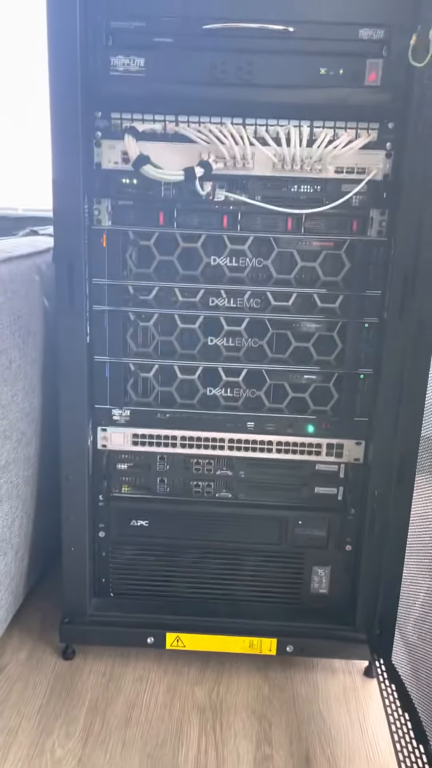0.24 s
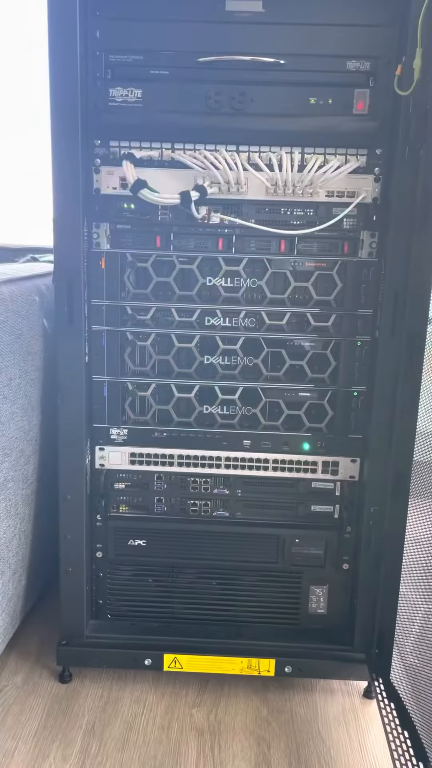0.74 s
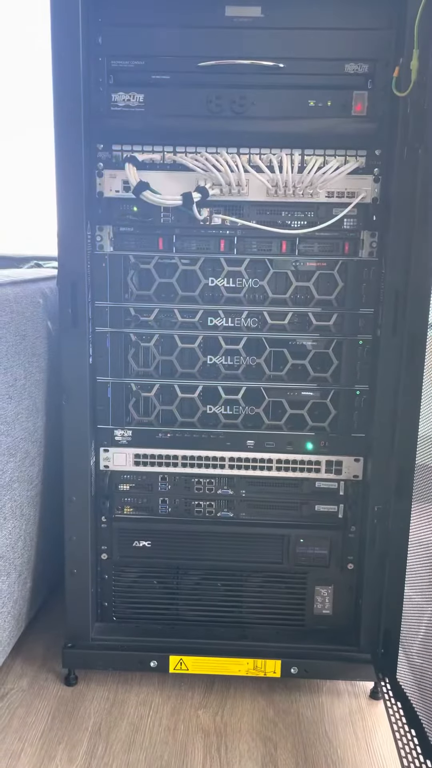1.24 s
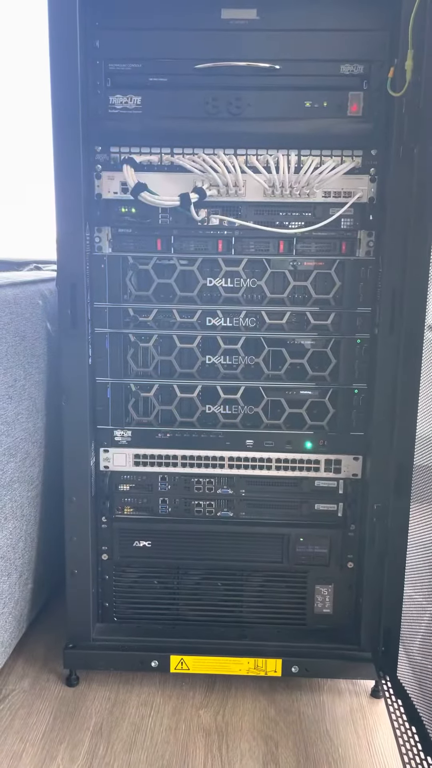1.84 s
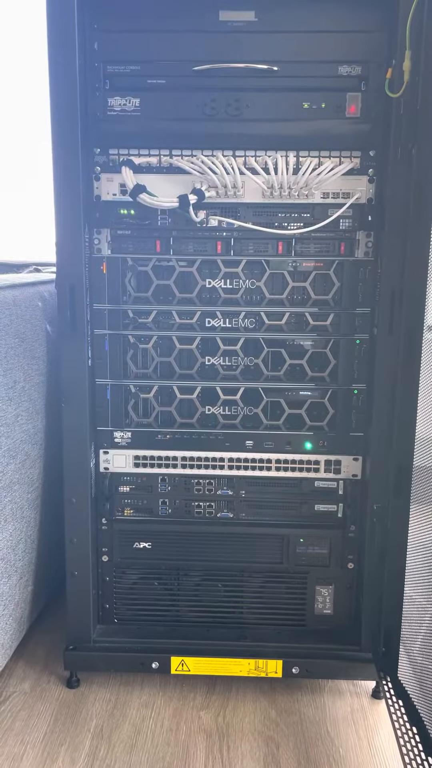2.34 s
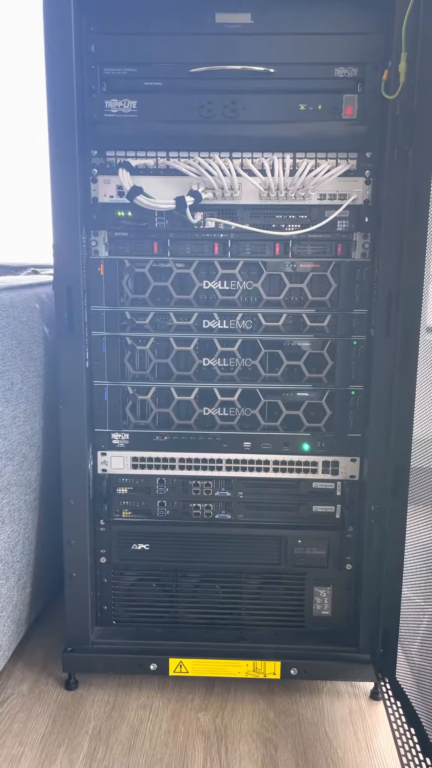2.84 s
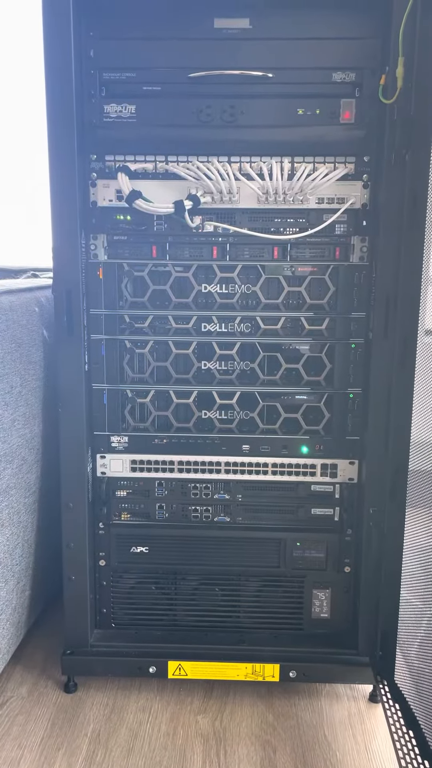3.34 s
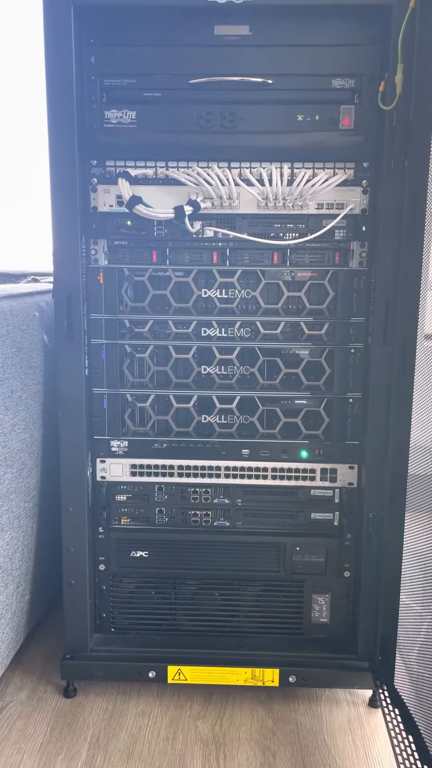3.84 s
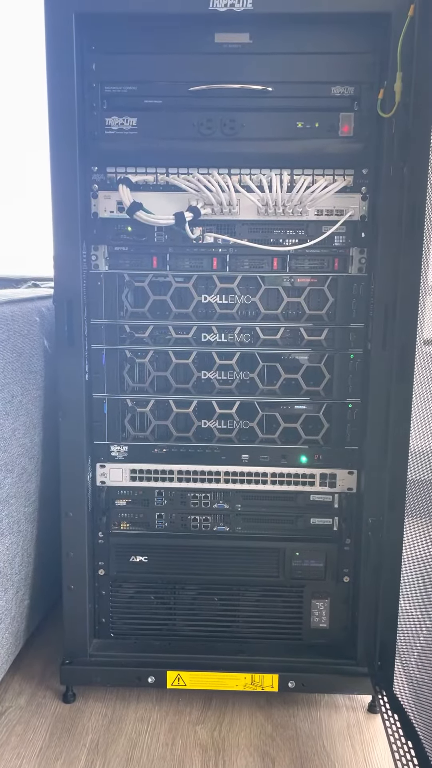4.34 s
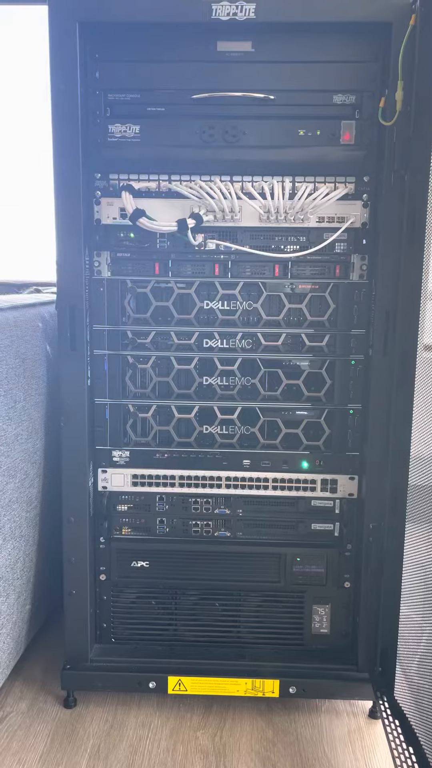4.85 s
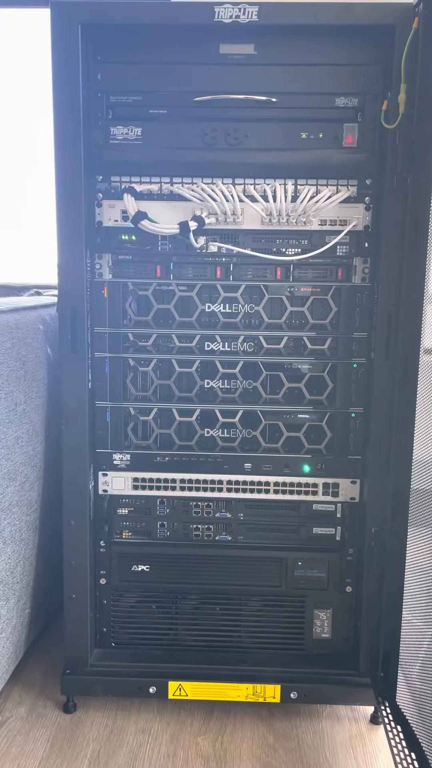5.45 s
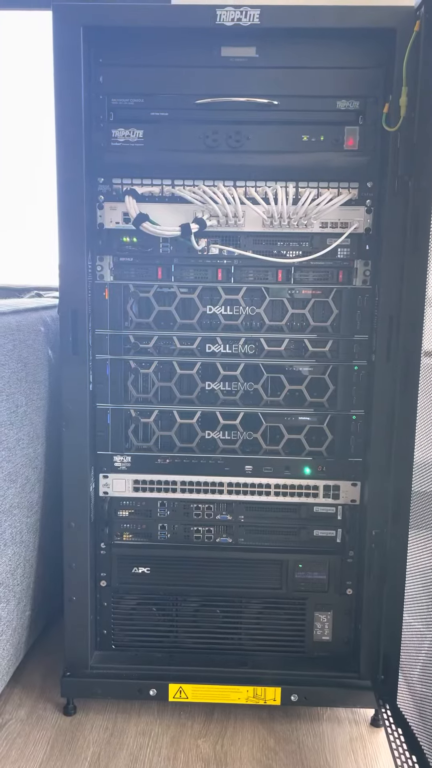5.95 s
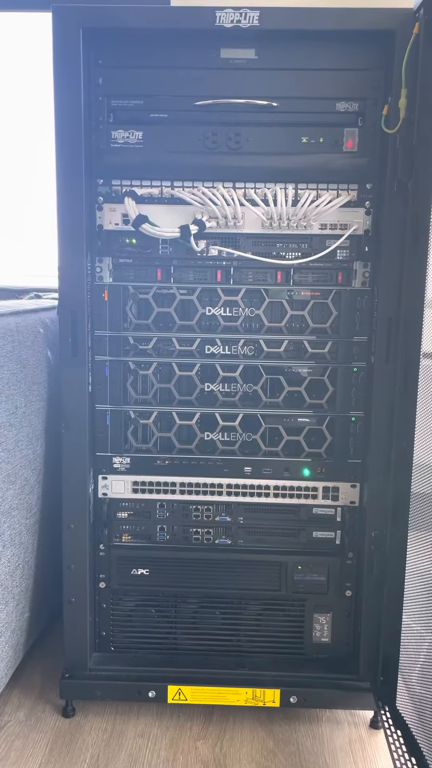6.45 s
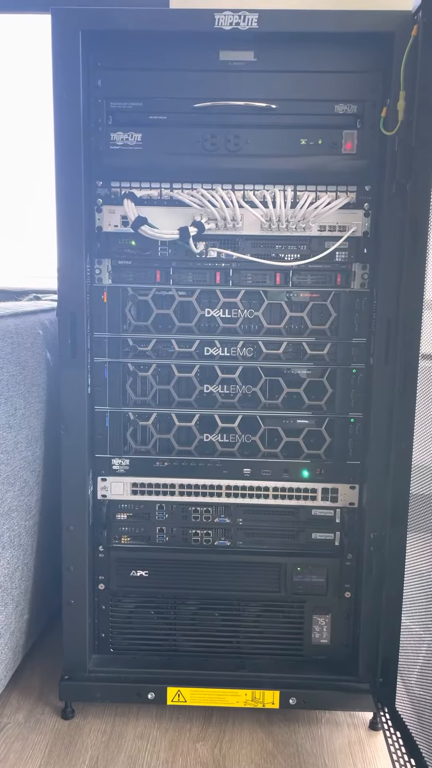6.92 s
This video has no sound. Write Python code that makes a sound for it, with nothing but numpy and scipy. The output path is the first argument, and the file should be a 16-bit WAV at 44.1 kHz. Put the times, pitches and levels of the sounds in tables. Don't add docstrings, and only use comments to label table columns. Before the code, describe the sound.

Small cooling fans in a server rack speed up from a mid-pitched hum to a fairly loud whine within about a second and a half, with air rush swelling alongside. The pitch peaks, then sinks very slightly and holds. Closely tuned fans beat, making the tone pulse and flutter. Other machines hum steadily underneath. Close stereo pickup in a small room.

```python
import sys
import numpy as np
from scipy import signal
from scipy.io import wavfile
from scipy.ndimage import uniform_filter1d

SR = 44100
rng = np.random.default_rng(int(sys.argv[2]) if len(sys.argv) > 2 else 0)


def unload_wav(signal):
    wavfile.write(
        sys.argv[1],
        SR,
        np.round(np.clip(np.atleast_2d(signal).T, -1, 1) * 32767).astype(np.int16),
    )


def volts(x):
    e = np.asarray(x, float) / 20
    return 10 ** e


N = 316638

# (frequency [Hz], density [dB per Hz])
RACK_SPECTRUM = [(12, -98), (30, -106), (52, -70), (90, -89.5), (200, -71), (400, -75), (700, -73.5),
                 (1400, -80.5), (2200, -77), (2800, -96.5), (3900, -82.5), (5600, -91), (6000, -93.5),
                 (15500, -120)]
# (frequency [Hz], width [Hz], density [dB per Hz])
CASE_HUMS = [(62, 16, -69), (121.9, 8.3, -66.5), (673, 19, -65.5), (1713, 61, -72.5), (2360, 54, -81),
             (3690, 43, -81)]
# (time [s], length [s], rise [dB])
BOOM_SURGES = [(.2, 0.56, 6.5), (1.0, 0.37, 3.5), (1.4, 0.4, 8.5), (2.2, .4, 2), (2.9, 0.38, 4),
               (3.57, 0.24, 7), (4.58, 0.27, 3.5), (4.95, 0.14, 5), (5.33, 0.1, 7.5), (5.7, .15, 6),
               (5.98, 0.17, 7), (6.52, 0.62, 6), (6.9, .5, 4)]
# (frequency [Hz], level [dB], swing [dB])
RACK_TONES = [
    (285, -58, 2.),
    (970, -62, 2.),
    (1713, -63, 2.),
]
# (time [s], length [s], rise [dB])
SLOW_FAN_SWELLS = [(.5, .2, 8), (1.04, .2, 17.5), (1.5, 0.47, 10), (2.2, 0.81, 10.5), (2.9, 0.33, 15.5),
                   (3.65, .2, 6), (4.2, 0.76, 8), (4.62, 0.13, 17), (4.95, .35, 12), (5.62, 0.34, 17.5),
                   (6.07, 0.26, 13), (6.85, 0.98, 16.5)]
# (frequency [Hz], density [dB per Hz])
AIR_RUSH = [(600, -77), (900, -74), (1280, -71), (1480, -83.5), (1750, -71), (2000, -84), (2400, -72.5),
            (2700, -81), (4200, -88.5), (5800, -90.5), (6500, -86), (9000, -100.5), (13300, -111),
            (15500, -113)]
# (multiple of blade rate [1], width [Hz], density [dB per Hz])
CHOPPED_AIR = [(1, 130, -64.5), (2, 53, -68.5), (3, 64, -70.5), (4, 180, -77), (5, 100, -79),
               (5.93, 95, -79), (7.1, 260, -79.5), (7.8, 83, -85.5), (9.1, 190, -86)]
# (frequency [Hz], width [Hz], density [dB per Hz])
DUCT = (4300, 120, -81.5)
# (multiple [1], level at full speed [dB], gain per 1% of speed [dB])
OVERTONES = [(2, -50, -0.4), (3, -51, 1.1), (4, -57, 0.55), (5, -72, .6), (6, -61, .6), (7, -76, 8),
             (8, -69.5, .3)]
# (time [s], multiple [1], length [s], change [dB])
OVERTONE_SWELLS = [(.5, 2, .4, 1.5), (.8, 2, .2, -13), (1.094, 2, 0.35, 6.5), (1.806, 2, 1.1, 5.5),
                   (2.45, 2, 0.33, 8), (3.08, 2, 0.29, 12.5), (3.53, 2, 0.21, 11), (3.986, 2, 0.31, 7.5),
                   (4.997, 2, 0.21, 6), (6.896, 2, .3, 3.5), (1.1, 3, 0.75, 4.5), (2.25, 3, 0.25, 2),
                   (2.92, 3, 0.16, 7), (3.5, 3, 0.91, 9.5), (4.7, 3, 0.76, 6), (6.2, 3, 1.6, -17),
                   (.8, 4, 1.1, 11.5), (2.0, 4, 0.37, 4), (3.1, 4, 0.9, 6.5), (5.106, 4, 0.3, 10),
                   (6.3, 4, .25, 8), (1.2, 6, .5, 9.5), (2.9, 6, 0.76, 6.5), (5.6, 6, 1.2, 9), (6.8, 6, 0.76, 7),
                   (3.0, 8, 2.1, 10), (4.6, 8, 1.4, 11.5)]
# (time [s], level [dB], dip that follows [dB])
SWELLS = [(0.24, -39, -28), (0.42, -40.5, -18), (0.633, -33.5, -10), (0.781, -34, -28), (0.885, -35.5, -23),
          (0.962, -34.5, -18), (1.09, -37, -25), (1.276, -30, -22), (1.471, -34, -18), (1.619, -38.5, -7.5),
          (1.986, -36.5, -7), (2.148, -34, -3.5), (2.348, -30, -9), (2.481, -29, -9.5), (2.695, -31, -1),
          (2.948, -41, -29), (3.148, -36.5, -14), (3.429, -35.5, -6), (3.8, -37, -11), (4.1, -38, -7),
          (4.53, -37.5, -8), (4.771, -37, -11), (4.976, -35.5, -8), (5.114, -35.5, -5), (5.29, -35.5, -27),
          (5.462, -36.5, -24), (5.705, -38, -1.5), (6.114, -39.5, -6.5), (6.55, -38.5, -5),
          (6.93, -38.5, -30)]
# (time [s], left over right [dB])
LEAN = [
    (0, -4),
    (3.8, -7),
    (4.3, -2),
    (5.3, 1),
    (7.18, 6),
]
# (frequency [Hz], likeness [0-1], right leads [rad], left over right [dB])
PORTS = [(0, 1, 0, 0), (150, .997, .02, .3), (300, .95, .2, 1), (500, .75, .85, -3.5), (700, .85, .75, -3),
         (950, .45, 2.1, -1.5), (1200, .8, .5, -6), (1480, .5, .7, -3), (1620, .9, -.6, -.5),
         (1900, .92, 0, -1.5), (2400, .9, -.7, -2.5), (3500, .3, -2.2, -3), (3900, .7, -3.0 - 1, -2.5),
         (4750, .72, -5.8, .8), (5300, .87, -6.6, 1), (6100, .75, -7.85, .3), (6900, .97, -9.3, 0),
         (8550, .965, -9.75, 0), (9300, .85, -11.2, 0), (10200, .96, -12.3, 0), (11800, .96, -12.9, 0),
         (12700, .85, -14.1, 0), (13400, .96, -15.4, 0), (14900, .96, -16, 0), (16000, .85, -17.6, 0)]

FULL_HZ = 580
SLOW_FAN_HZ, SLOW_FAN_DB = 189, -65
BOOM_HZ, BOOM_WIDTH_HZ, BOOM_DB = 258, 20, -62


def evened(x):
    return x / np.sqrt(np.mean(x ** 2) + 1e-20)


def read(points, hz):
    f, value = np.transpose(points)
    return np.interp(np.log(hz + 1), np.log(f + 1), value)


def curve(rows, t):
    places, *columns = np.transpose(rows)
    return [np.interp(t, places, column) for column in columns]


def drift(t, top_hz, count):
    hz = np.geomspace(.1, top_hz, 16)
    turns = hz[:, None] * t + rng.random((count, 16, 1))
    return evened((np.sin(2 * np.pi * turns) / np.sqrt(hz[:, None])).sum(1))


def surges(rows, t):
    return sum(db * np.exp(-(2 * (t - s) / length) ** 2) for s, length, db in rows)


def hump(hz, centre_hz, width_hz, db):
    return volts(db) ** 2 / (1 + ((hz - centre_hz) / width_hz * 2) ** 2) ** 1.5


def blade_rate(t):
    ramp = 476 + 88 * t
    settle = 560 + 33.5 * np.exp((1.9 - t) / 2.0)
    round_hz = 12
    return -round_hz * np.logaddexp(-ramp / round_hz, -settle / round_hz)


def rack_hum(hz, t):
    steady = volts(read(RACK_SPECTRUM, hz)) ** 2 + sum(hump(hz, *row) for row in CASE_HUMS)
    return steady + hump(hz, BOOM_HZ, BOOM_WIDTH_HZ, BOOM_DB + surges(BOOM_SURGES, t))


def rack_tones(t):
    out, slow = np.zeros((2, N)), t[::512]
    slow_fan = (SLOW_FAN_HZ, SLOW_FAN_DB + surges(SLOW_FAN_SWELLS, t), .6)
    for hz, db, swing_db in RACK_TONES + [slow_fan]:
        bend, swell = (np.interp(t, slow, wander) for wander in drift(slow, 4., count=2))
        angle = 2 * np.pi * np.cumsum(hz * (1 + .002 * bend)) / SR
        _, lead, pan_db = curve(PORTS, hz)
        left = volts(pan_db / 2) * np.cos(angle)
        right = volts(-pan_db / 2) * np.cos(angle + lead)
        out += np.sqrt(2) * volts(db + swing_db * swell) * np.array([left, right])
    return out


def fan_air(hz, speed):
    blow = volts(146 * np.log10(speed / FULL_HZ))
    chopped = sum(hump(hz, k * speed, width_hz, db) for k, width_hz, db in CHOPPED_AIR)
    return (volts(read(AIR_RUSH, hz)) ** 2 + chopped + hump(hz, *DUCT)) * blow


def air(size=4096):
    hz, t, z = signal.stft(rng.standard_normal((2, N)), SR, nperseg=size)
    hz = hz[:, None]
    power = fan_air(hz, blade_rate(t)) + rack_hum(hz, t)
    patches = uniform_filter1d(rng.standard_normal(z[0].shape), size=24, axis=0)
    patches = evened(uniform_filter1d(patches, size=3, axis=1))
    flutter_db = 0.89 * patches + 0.05 * drift(t, 1.6, count=1)
    level = np.sqrt(power * SR / 2) * volts(flutter_db)
    same, lead, pan_db = curve(PORTS, hz)
    same = np.clip(same, 0, 1)
    right = (same * z[0] + np.sqrt(1 - same ** 2) * z[1]) * np.exp(1j * lead)
    both = np.array([z[0] * volts(pan_db / 2), right * volts(-pan_db / 2)]) * level
    return signal.istft(both, SR, nperseg=size)[1][:, :N]


def bank_levels(t):
    faster = 100 * (blade_rate(t) / FULL_HZ - 1)
    levels = []
    for k, db, slope in OVERTONES:
        own_swells = [(s, length, rise) for s, multiple, length, rise in OVERTONE_SWELLS if multiple == k]
        levels.append(db + slope * faster + surges(own_swells, t))
    return levels


def overtones(speed, turns, t, count=6):
    slow, out = t[::512], np.zeros((2, N))
    levels = [np.interp(t, slow, volts(db)) for db in bank_levels(slow)]
    off_speed = np.linspace(-1, 1, count)[:, None] * .005 + .003 * drift(slow, 5., count=count)
    nearness = 1 + 0.9 * (np.arange(count) == count // 2)
    for fan, near in zip(off_speed, evened(nearness)):
        own_turns = turns + np.cumsum(speed * np.interp(t, slow, fan)) / SR
        for k, level in enumerate(levels, start=2):
            same, lead, pan_db = curve(PORTS, k * speed[::512])
            lead = lead + 3.2 * (1 - same) * rng.standard_normal()
            angle = 2 * np.pi * (k * own_turns + rng.random())
            gain = level * near * np.sqrt(2 / count)
            tilt = np.interp(t, slow, volts(pan_db / 2))
            out[0] += gain * tilt * np.cos(angle)
            out[1] += gain / tilt * np.cos(angle + np.interp(t, slow, lead))
    return out


def blade_tone(speed, turns, t):
    swell_s, _, dip_db = np.transpose(SWELLS)
    slow = t[::512]
    beat = np.interp(t, np.r_[.08, swell_s, t[-1] + .1], np.arange(-1, len(swell_s) + 1))
    level_db = curve([(0, -47, 0)] + SWELLS, t)[0]
    dip_s = (swell_s + np.r_[swell_s[1:], t[-1]]) / 2
    left_over = volts(np.minimum(np.interp(t, dip_s, dip_db), 0))
    stronger = (1 + left_over) / 2 * np.exp(1j * np.pi * beat)
    weaker = (1 - left_over) / 2 * np.exp(-1j * np.pi * beat)
    tone = np.sqrt(2) * volts(level_db) * (stronger + weaker) * np.exp(2j * np.pi * turns)

    pan_db = curve(LEAN, t)[0] - 0.1 * np.interp(t, slow, drift(slow, 3.3, count=1)[0])
    left_share = 1 / (1 + volts(-pan_db) ** 2)
    lead = curve(PORTS, speed)[1] + .3 * np.interp(t, slow, drift(slow, 1.5, count=1)[0])
    left = np.sqrt(2 * left_share) * tone
    right = np.sqrt(2 - 2 * left_share) * tone * np.exp(1j * lead)
    return np.array([left, right]).real


def scene():
    t = np.arange(N) / SR
    speed = blade_rate(t)
    turns = np.cumsum(speed) / SR
    background = air() + rack_tones(t)
    return background + volts(-1.5) * overtones(speed, turns, t) + blade_tone(speed, turns, t)


def roll_off(x):
    return signal.sosfilt(signal.butter(12, 15780, fs=SR, output="sos"), x)


def record(dry):
    bass_cut = signal.butter(4, 44, "highpass", fs=SR, output="sos")
    mix = signal.sosfilt(bass_cut, dry)
    return roll_off(mix)


dry = scene()
out = record(dry)
unload_wav(out)
```